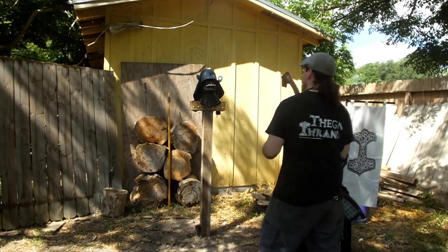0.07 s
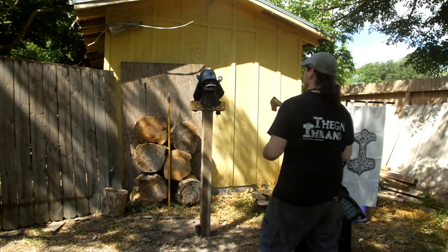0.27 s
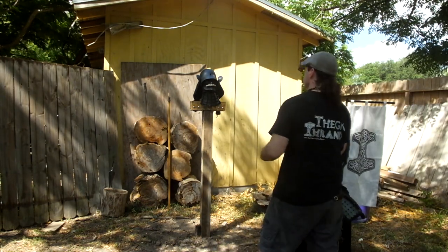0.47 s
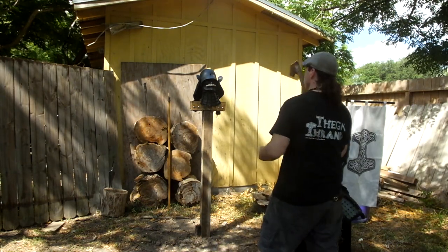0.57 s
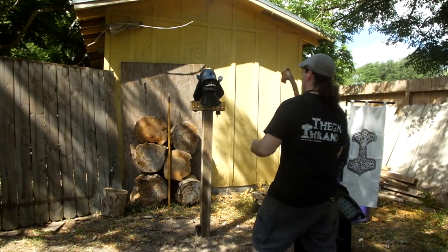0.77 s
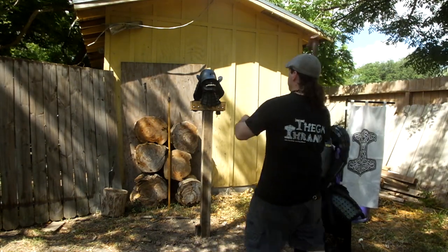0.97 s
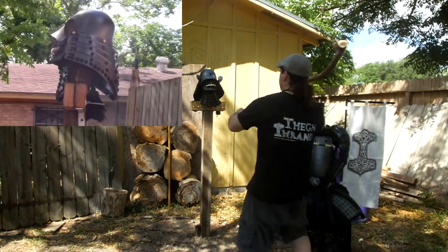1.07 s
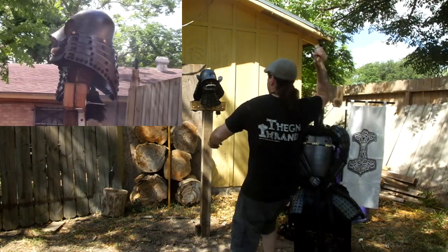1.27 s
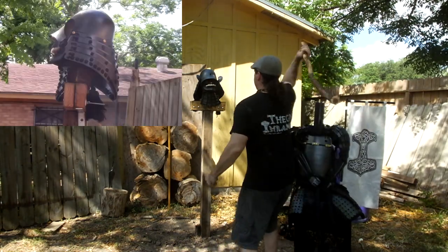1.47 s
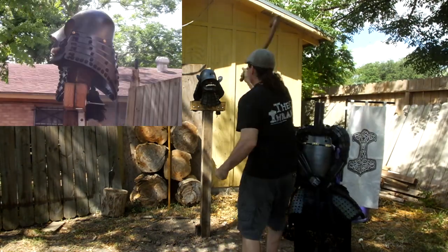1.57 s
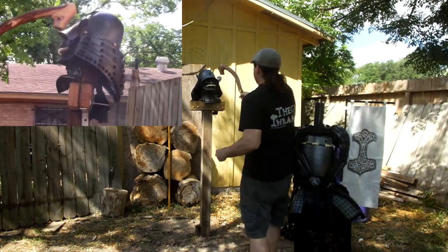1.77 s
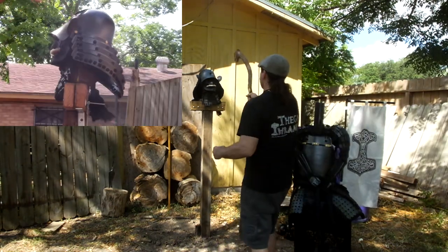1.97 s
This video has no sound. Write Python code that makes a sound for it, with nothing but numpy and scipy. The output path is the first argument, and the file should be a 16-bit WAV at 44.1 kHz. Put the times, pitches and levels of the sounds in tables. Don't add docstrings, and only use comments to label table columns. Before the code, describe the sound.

Soft outdoor air with rustling and small bird whistles dips in level, then a single splintery wood-on-metal crack bursts out, slaps off nearby walls and fades quickly, heard in stereo from a few metres.

```python
import sys
import numpy as np
from scipy import signal
from scipy.fft import rfft, irfft
from scipy.io import wavfile
from scipy.ndimage import uniform_filter1d

SR = 44100
rng = np.random.default_rng(int(sys.argv[2]) if len(sys.argv) > 2 else 0)


def rack_gain(trim_db):
    fader = np.asarray(trim_db, float)
    return 10 ** (fader / 20)


def put_to_file(sound):
    columns = np.atleast_2d(sound).T
    safe = np.clip(columns, -1, 1)
    whole_steps = np.round(safe * 32767)
    wavfile.write(sys.argv[1], SR, whole_steps.astype(np.int16))


N = 89699

HIT_S = 1.6372
MIC_LAG_S = 0.000036

# (frequency [Hz], level [dB], 60 dB decay time [s])
SHELL_MODES = [(270, -1, 0.1), (330, -1, .06), (450, -4, .03), (900, -7, 0.11), (1150, 3, .028),
               (1250, -2, .03), (1630, -7.5, 0.056), (1880, -10.5, 0.08), (2450, -6.5, 0.059),
               (2720, -5.5, 0.049), (3400, -2, .025), (4150, -1, .013), (4700, -2, .015), (6840, 2, .015)]
# (frequency [Hz], density [dB per Hz])
CRACK_SPECTRUM = [(100, -26), (500, -12), (1230, -15), (2100, -15), (4300, -2), (6700, -4), (10000, -10),
                  (16000, -20)]
# (time [s], level [dB], left-right balance [dB])
WALL_ECHOES = [
    (1.6431, -9.5, -8),
    (1.6477, -5.5, -3),
    (1.6530, -17, -5),
    (1.6620, -12.5, -10),
    (1.6790, -20, -7),
    (1.6830, -21.5, 9),
    (1.6910, -23, 0),
    (1.7010, -24, -13),
    (1.7140, -20, 6),
]
# (time [s], level [dB], frequency [Hz], half length [s], left-right balance [dB])
HOUSE_KNOCKS = [(1.76, -31, 1100, .002, 0), (1.7865, -33, 1340, 0.0029, 0), (1.797, -32, 3000, .001, 0),
                (1.8040, -24, 1240, 0.0029, 0), (1.811, -33, 1490, 0.0027, 3), (1.8760, -46, 1450, .002, 0),
                (1.8803, -33, 1430, 0.0038, 0), (1.8863, -31, 1480, 0.0015, 0),
                (1.8960, -33, 1520, .011, 0), (1.8180, -36, 1300, .002, 5), (1.9016, -36, 1450, 0.0016, 0),
                (1.8765, -45, 4400, .0012, -4), (1.885, -42, 4250, .0015, 0), (1.8925, -44, 4000, .0012, 0),
                (1.6491, -6, 900, 0.0019, 1), (1.682, -19.5, 300, 0.0062, 1),
                (1.691, -16, 1880, 0.0077, -2), (1.6800, -9.5, 2200, 0.0015, 0),
                (1.684, -17, 4200, 0.00092, -4)]
# (time [s], level [dB])
YARD_ENVELOPE = [(1.637, -19.5), (1.65, -18), (1.673, -17.5), (1.685, -17), (1.722, -22), (1.745, -28.5),
                 (1.79, -35.5), (1.85, -45), (2.03, -62)]
# (frequency [Hz], density [dB per Hz])
YARD_SPECTRUM = [(100, -32), (200, -22), (320, -5), (650, -10), (950, -3), (1950, -4), (7140, -11),
                 (16000, -28)]
# (frequency [Hz], slope [dB per s])
YARD_FADING = [(100, -40), (300, -43), (600, -27), (1400, -2), (4000, -13), (9000, -17), (16000, -49)]
# (frequency [Hz], correlation [0-1])
YARD_LIKENESS = [(100, .85), (600, 0.5), (2000, 0.64), (6000, 0.52), (11000, 0.76), (15000, 0.82)]
# (time [s], level [dB])
RUSTLE_ENVELOPE = [(0, -59), (.12, -62), (.28, -66), (.39, -58.5), (.5, -67), (.8, -69), (1.0, -69),
                   (1.1, -54), (1.18, -65), (1.28, -65), (1.45, -70), (2.03, -70)]
# (start [s], length [s], level [dB], start frequency [Hz], end frequency [Hz])
BIRD_NOTES = [(-.07, .16, -55, 2500, 2486), (.09, 0.044, -67, 2600, 2570), (.435, 0.031, -57, 4520, 4520),
              (.36, 0.028, -62, 3850, 3820), (.378, .018, -60, 3550, 3400), (.405, .025, -59, 2700, 2760),
              (0.776, 0.041, -56.5, 2534, 2650), (.805, 0.038, -54.5, 2470, 2450),
              (0.913, 0.063, -54, 1718, 1724), (1.032, 0.035, -52, 2535, 2570),
              (1.065, 0.07, -51.5, 2470, 2460), (1.238, 0.057, -60.5, 2580, 2570),
              (1.299, 0.04, -52, 2544, 2480), (1.335, 0.063, -61, 2480, 2450)]
# (frequency [Hz], density [dB per Hz])
AIR_SPECTRUM = [(12, -33), (20, 9.5), (53, -4.5), (759, -4.5), (2260, -15), (2530, -15.5), (2910, -17),
                (6010, -22), (16000, -35)]
# (frequency [Hz], correlation [0-1])
AIR_LIKENESS = [(60, 0.17), (240, 0.11), (950, 0.31), (3770, 0.27), (15000, 0.057)]


def evened(x):
    return x / np.sqrt(np.mean(x ** 2) + 1e-20)


def read(points, hz):
    f, value = np.transpose(points)
    return np.interp(np.log(hz + 1), np.log(f + 1), value)


def curve(points, t):
    return np.interp(t, *np.transpose(points))


def add(mix, start_s, sound, pan_db=0., lag_s=0.):
    size = 2 * len(sound)
    hz = np.fft.rfftfreq(size, 1 / SR)
    lags = np.array([[0], [lag_s]])
    pair = irfft(rfft(sound, size) * np.exp(-2j * np.pi * hz * lags))
    pair = pair * rack_gain(np.array([[pan_db / 2], [-pan_db / 2]]))
    at = round(start_s * SR)
    part = mix[:, max(at, 0):at + size]
    part += pair[:, max(-at, 0):][:, :part.shape[1]]


def noise(likeness, field_db, size, lag_s=0.):
    hop = size // 4
    frames, hz = N // hop + 5, np.fft.rfftfreq(size, 1 / SR)
    a, b, c, d = rng.standard_normal((frames, len(hz), 4)).T
    like = np.clip(read(likeness, hz), -1, 1)[:, None]
    left = a + 1j * b
    late = left * np.exp(-2j * np.pi * hz * lag_s)[:, None]
    right = like * late + np.sqrt(1 - like ** 2) * (c + 1j * d)
    spectra = np.array([left, right]) * rack_gain(field_db(hz[:, None], np.arange(frames) * hop / SR))
    return signal.istft(spectra, nperseg=size, noverlap=size - hop)[1][:, :N]


def patches(shape, wide, long):
    field = rng.standard_normal(shape[::-1]).T
    field = uniform_filter1d(field, size=wide, axis=0)
    return evened(uniform_filter1d(field, size=long, axis=1))


def blow():
    t = np.arange(4096) / SR
    shell = sum(rack_gain(db - 60 * t / t60) * np.sin(2 * np.pi * hz * t) for hz, db, t60 in SHELL_MODES)
    shell = rack_gain(-10) * shell * np.minimum(t / 0.0013, 1)
    colour = rack_gain(read(CRACK_SPECTRUM, np.fft.rfftfreq(len(t), 1 / SR)))
    crack = evened(irfft(rfft(rng.standard_normal(len(t))) * colour))
    crack_rise_s, crack_t60_s = 0.00026, 0.042
    crack = crack * rack_gain(-7.5 - 60 * t / crack_t60_s) * np.minimum(t / crack_rise_s, 1)
    return shell + crack


def strike():
    out, sound = np.zeros((2, N)), blow()
    add(out, HIT_S, sound, lag_s=MIC_LAG_S)
    thin = signal.lfilter(*signal.butter(N=1, Wn=690, btype="high", fs=SR), sound)
    spread = rng.uniform(-1.1, 1, len(WALL_ECHOES))
    for (start_s, db, pan_db), turn in zip(WALL_ECHOES, spread):
        add(out, start_s, rack_gain(db) * thin, pan_db, MIC_LAG_S * (1 + 0.3 * turn))
    for centre_s, db, hz, length, pan_db in HOUSE_KNOCKS:
        t = np.arange(-length, length, 1 / SR)
        knock = np.exp(-(2.7 * t / length) ** 2) * np.sin(2 * np.pi * hz * t)
        add(out, centre_s - length, rack_gain(db) * knock, pan_db, MIC_LAG_S)
    return out


def yard():
    def field_db(hz, s):
        fading = read(YARD_FADING, hz) * np.maximum(s - HIT_S, 0)
        return read(YARD_SPECTRUM, hz) + fading + 1.6 * patches((len(hz), len(s)), wide=8, long=5)

    t = np.arange(N) / SR
    scatter = evened(noise(YARD_LIKENESS, field_db, size=256, lag_s=MIC_LAG_S))
    return scatter * rack_gain(curve(YARD_ENVELOPE, t)) * (t > HIT_S)


def rustle():
    clicks_per_s, band_hz = 2500, (1760, 8900)
    hits = rng.random((2, N)) < clicks_per_s / SR
    strength = rack_gain(3.3 * np.minimum(rng.exponential(1, (2, N)), 4))
    clicks = hits * rng.standard_normal((2, N)) * strength
    shared = clicks + 0.5 * clicks[::-1]
    crackle = signal.lfilter(*signal.butter(2, band_hz, "band", fs=SR), shared)
    return evened(crackle) * rack_gain(curve(RUSTLE_ENVELOPE, np.arange(N) / SR))


def birds():
    out = np.zeros((2, N))
    for start_s, length, db, first_hz, last_hz in BIRD_NOTES:
        u = np.arange(0, length, 1 / SR) / length
        wander = evened(uniform_filter1d(rng.standard_normal(8192), size=300))[:len(u)]
        flutter, wobble = 1 + 0.3 * wander, 1 + 0.005 * wander[::-1]
        hz = (first_hz + (last_hz - first_hz) * u) * wobble
        note = np.sin(2 * np.pi * np.cumsum(hz) / SR)
        swell = np.sin(np.pi * u) ** 0.5
        add(out, start_s, rack_gain(db + 6) * swell * flutter * note, -2, -MIC_LAG_S)
    return out


def air():
    def field_db(hz, s):
        return read(AIR_SPECTRUM, hz) + 0.83 * patches((len(hz), len(s)), wide=10, long=10)

    return rack_gain(-42) * evened(noise(AIR_LIKENESS, field_db, size=1024))


def background_gain():
    t = np.arange(N) / SR
    turn_down_s, turn_time_s, lead_s, recovery_s = 1.338, 0.0037, 0.0055, 0.03
    step_db = -6.5 * np.clip((t - turn_down_s) / turn_time_s + 0.5, 0, 1)
    since = t - HIT_S + lead_s
    dip_db = -15 * np.clip(since / 0.002, 0, 1) * np.exp(-np.maximum(since, 0) / recovery_s)
    return rack_gain(step_db + dip_db)


def scene():
    return strike() + yard() + (rustle() + birds() + air()) * background_gain()


def top_cut(x):
    return signal.sosfilt(signal.butter(12, 16660, fs=SR, output="sos"), x)


def record(dry):
    ceiling = 0.74
    limited = dry / (1 + (dry / ceiling) ** 4) ** (1 / 4)
    edge = signal.firwin(numtaps=193, cutoff=15830, window=("kaiser", 6), fs=SR)
    mix = signal.oaconvolve(limited, edge[None], "same")
    return top_cut(mix)


dry = scene()
out = record(dry)
put_to_file(out)
```